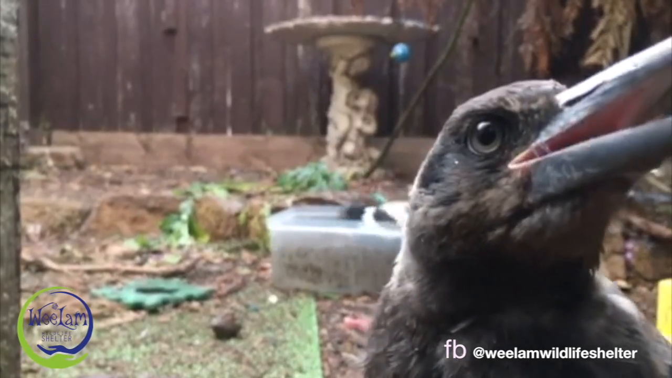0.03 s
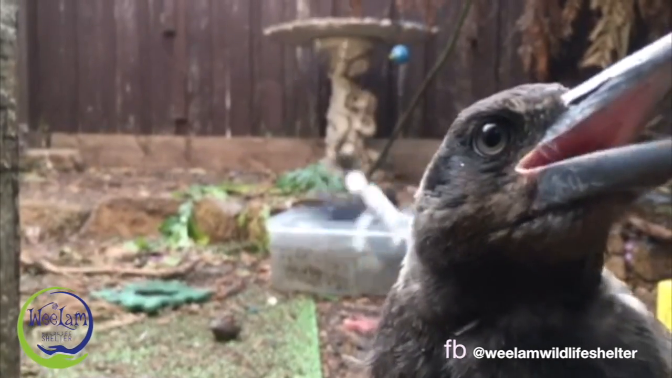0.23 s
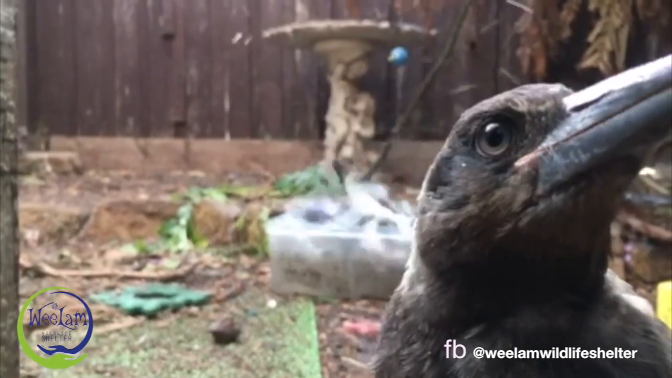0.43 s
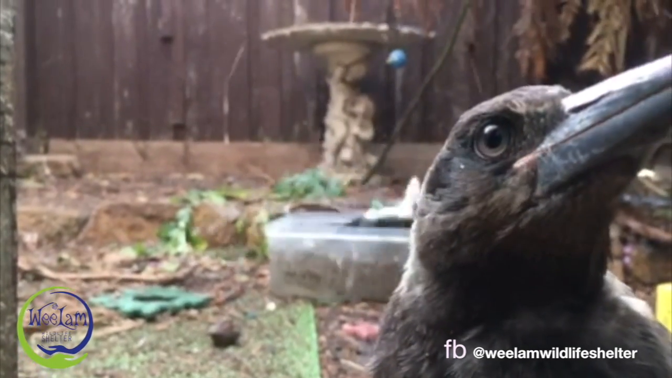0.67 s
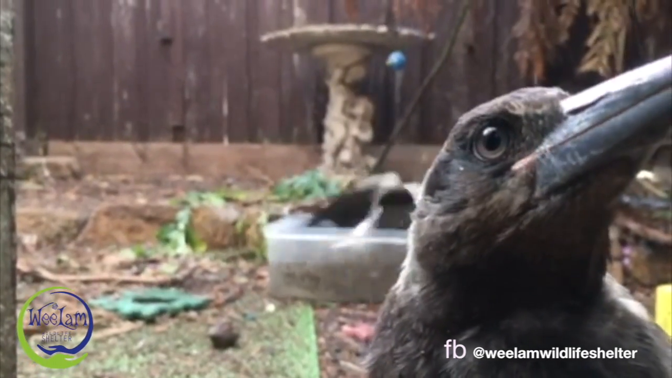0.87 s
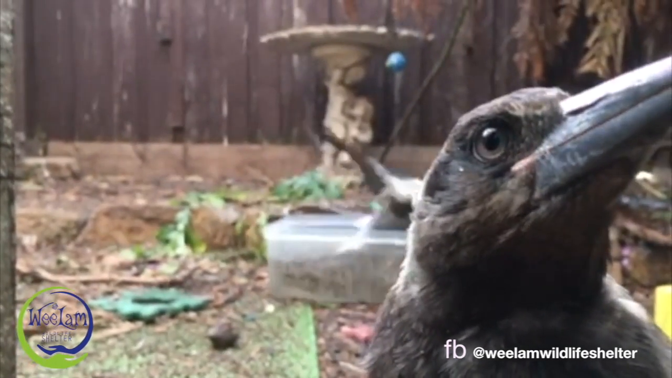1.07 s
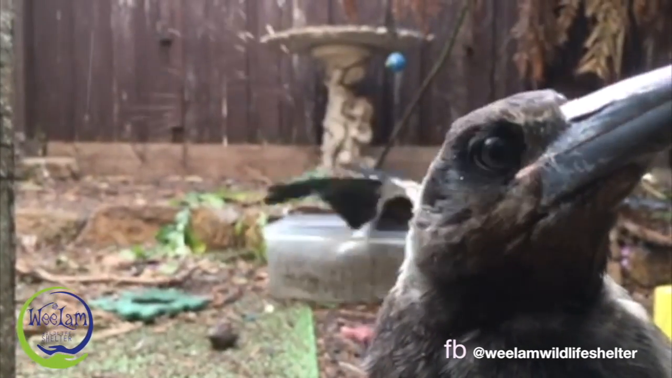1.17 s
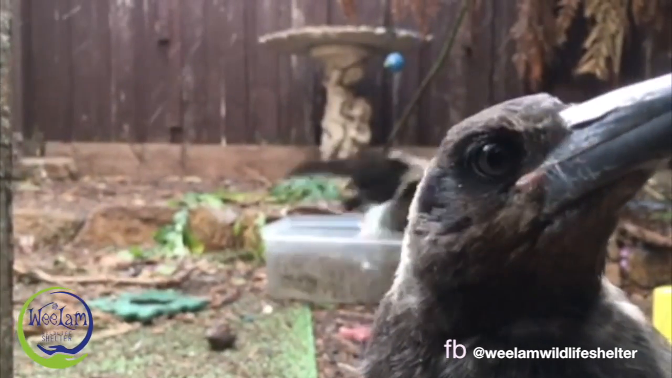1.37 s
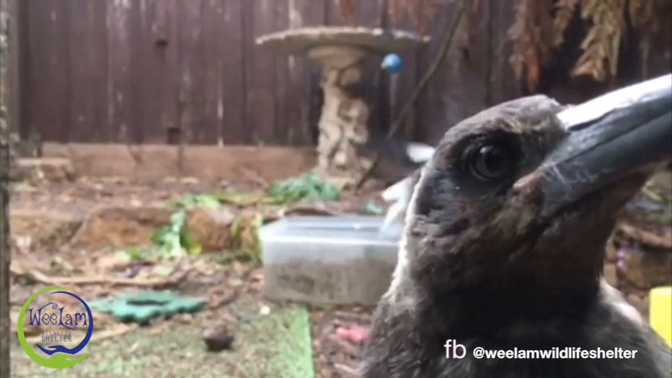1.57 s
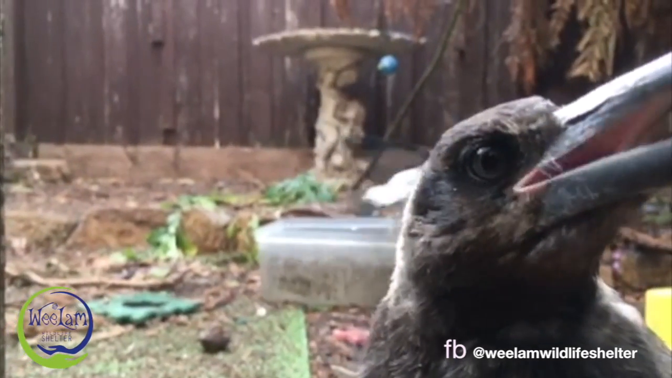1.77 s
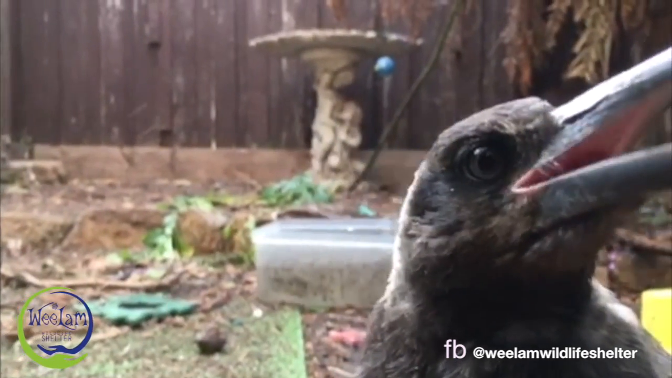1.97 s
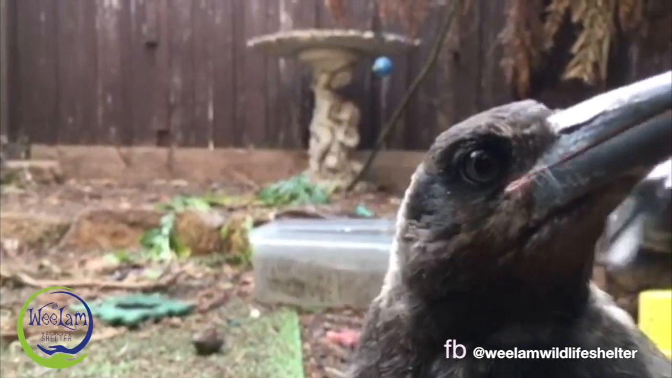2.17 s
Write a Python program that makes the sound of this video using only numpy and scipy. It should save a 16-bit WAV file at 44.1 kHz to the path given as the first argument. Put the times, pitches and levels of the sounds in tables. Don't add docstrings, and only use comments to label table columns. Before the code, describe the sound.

Two brief magpie squawks near the microphone, with light water splashes and clicks behind them

```python
import sys
import numpy as np
from scipy import signal
from scipy.fft import rfft, irfft, next_fast_len
from scipy.io import wavfile
from scipy.ndimage import uniform_filter1d, map_coordinates

SR = 44100
rng = np.random.default_rng(int(sys.argv[2]) if len(sys.argv) > 2 else 0)


def unload_wav(signal):
    wavfile.write(
        sys.argv[1],
        SR,
        np.round(np.clip(np.atleast_2d(signal).T, -1, 1) * 32767).astype(np.int16),
    )


def invert_db(x):
    u = np.asarray(x, float) / 20
    return 10 ** u


N = 99225
T = np.arange(N) / SR

# time in seconds, level in dB.
TOWN_LEVEL = [(0.0, -59.5), (0.1, -51), (0.41, -57), (0.44, -51), (0.52, -57.5), (0.6, -48.5),
              (0.73, -60.5), (0.83, -47), (0.88, -57.5), (0.93, -47.5), (1.02, -53), (1.15, -52.5),
              (1.23, -53.5), (1.27, -53), (1.98, -52.5), (2.07, -56), (2.1, -52), (2.25, -58)]
# frequency in Hz, density in dB per Hz.
RUMBLE_SPECTRUM = [(20, -44), (32, -24), (42, 0), (52, 2.5), (62, -5.5), (120, -13.5), (300, -23.5),
                   (700, -55.5)]
AIR_SPECTRUM = [(200, -39.5), (320, 0.5), (870, 0.5), (2100, -10), (5000, -14), (16000, -27)]
# frequency in Hz, 60 dB decay in seconds.
YARD_DECAY = [(500, 0.18), (2500, 0.28), (9000, 0.12)]
# start in seconds, length in seconds, first pitch in Hz, last pitch in Hz, level in dB.
FAR_MAGPIE_NOTES = [
    (-.03, .075, 1350, 1330, -70),
    (1.375, .085, 1225, 1260, -68),
    (1.45, .1, 1265, 1225, -71),
    (1.35, .06, 1050, 1060, -74),
    (1.43, .11, 1530, 1600, -79),
]
WHISTLE_NOTES = [
    (.745, .095, 1895, 1890, -70),
    (1.445, .07, 2660, 2720, -72),
    (1.535, .08, 2600, 2690, -62),
    (1.67, .1, 2660, 2740, -67),
    (1.76, .075, 2780, 2720, -69),
    (1.83, .05, 2700, 2680, -77),
]
PURE_NOTES = [(.115, .065, 3730, 3830, -61), (1.46, .05, 2850, 3050, -69), (1.49, .055, 3150, 2950, -68),
              (1.52, .03, 2300, 2150, -67), (.75, .04, 3800, 3790, -63), (.79, .05, 3800, 3770, -65),
              (.33, .1, 2520, 2480, -75), (1.415, .13, 3700, 3770, -67), (1.49, .11, 3530, 3480, -70),
              (1.432, .04, 800, 1200, -59), (.9, .17, 5400, 5250, -79), (1.02, .13, 660, 580, -70),
              (1.715, .03, 3150, 3150, -61), (1.75, .15, 1230, 1200, -74)]
# multiple of the pitch, level in dB.
FAR_MAGPIE_TONE = [(1, -9), (2, -1), (3, -5), (4, -12), (5, -18), (6, -16)]
WHISTLE_TONE = [(1, 0), (2, -9)]
# start in seconds, length in seconds, level in dB.
RUSTLE_BOUTS = [
    (.11, 0.13, -70.5),
    (.24, 0.092, -60),
    (.44, 0.306, -62.5),
    (.76, 0.24, -72.5),
    (2.11, 0.017, -67),
]
# frequency in Hz, density in dB per Hz.
MIST_SPECTRUM = [(700, -29.5), (3000, -3), (9500, -1), (16000, -12.5)]
SPRAY_SPECTRUM = [(180, -11), (300, -20), (494, -17), (624, -5.5), (689, -18), (1320, -13), (2440, -21.5),
                  (11700, -29.5), (16000, -39.5)]
# time in seconds, peak in dB, pitch in Hz.
SPATTER_DROPS = [(0.4418, -56, 3620), (0.4518, -58, 2500), (0.4523, -50, 4060), (0.4742, -46.5, 4220),
                 (0.4912, -43.5, 3203), (0.5141, -47, 4000), (0.568, -57, 4200), (0.6034, -43.5, 3700),
                 (0.6404, -47, 4000), (0.6937, -46, 6400), (0.7287, -43.5, 4740), (0.7601, -37.5, 3820),
                 (0.8813, -45.5, 6053), (0.9511, -49, 3860), (1.1098, -62, 3800)]
FINE_SPATTER_DROPS = [(0.4413, -61, 9720), (0.5171, -40, 11300), (0.568, -60, 8370), (0.5989, -48, 9500),
                      (0.6693, -63, 8900), (0.6942, -44, 12800), (0.7152, -58, 9200), (0.7312, -50, 10000),
                      (0.8753, -61, 11500), (0.9412, -64, 9200), (1.0484, -68, 7700), (1.1238, -65, 9530),
                      (1.1746, -49, 9700), (1.2162, -48.5, 9280)]
# time in seconds, peak in dB, pitch in Hz.
BUBBLES = [(0.433, -48, 1000), (0.471, -38, 982), (0.523, -33, 1135), (0.534, -34, 596),
           (0.565, -39.5, 1840), (0.579, -37.5, 1260), (0.613, -39.5, 2100), (0.648, -46, 970),
           (0.695, -38, 1640), (0.71, -43.5, 780), (0.729, -44, 474), (0.905, -42, 642),
           (1.137, -48.5, 1010), (1.159, -47, 1720), (1.186, -48, 587), (1.214, -31.5, 890),
           (1.218, -47.5, 242), (1.274, -47, 1460), (1.616, -40, 260), (1.723, -49, 3200),
           (1.767, -48, 430), (2.067, -57, 890), (2.21, -53.5, 315)]
# start in seconds, length in seconds, vigour in dB.
SPLASH_BOUTS = [
    (-.02, 0.02, -62.5),
    (0.437, 0.16, -57.5),
    (0.638, 0.12, -60),
    (0.716, 0.16, -70.5),
    (0.904, 0.096, -65),
    (1.115, 0.13, -67.5),
    (1.617, 0.01, -58),
    (1.7, 0.022, -66),
    (2.09, 0.022, -80),
    (2.222, 0.038, -73.5),
]
# time in seconds, peak in dB, pitch in Hz, ring over crack in dB.
TICKS = [
    (0.5676, -48.5, 5640, 0),
    (0.6943, -43.5, 12700, -6),
    (0.7891, -63, 5200, 11),
    (0.9507, -66, 4050, 13.5),
    (1.1849, -47, 4620, -4),
    (1.6283, -30, 5760, -7),
    (2.0462, -53.5, 9100, -7.5),
    (2.0872, -50.5, 9830, -4.5),
    (2.1131, -48, 4730, 2.5),
]
# time in seconds, pitch in Hz, level in dB, dullness in dB per octave, beak closing 0-1.
CLEAR_CALL = [
    (.199, 1200, -48, 14, 0),
    (.207, 1228, -18, 1.5, 0),
    (.221, 1270, -14, 0, .05),
    (.231, 1282, -14, 0, .85),
    (.255, 1272, -14.5, 1.5, 1),
    (.268, 1234, -21, 6.5, 1),
    (.303, 1190, -30.5, 11.5, 1),
    (.316, 1130, -42, 27, 1),
    (.336, 980, -68, 45, 1),
]
HOARSE_CALL = [
    (1.904, 822, -72, 44, 0),
    (1.9095, 820.3, -39, 15, 0),
    (1.914, 814.7, -26, 2.5, 0),
    (1.917, 834.7, -40, 2, 0),
    (1.923, 853, -29, 0.5, 0),
    (1.961, 871.7, -26.5, 0.5, 0),
    (1.981, 819.3, -28, 2.5, 0),
    (1.989, 806, -35, 12.5, 0),
    (1.999, 725, -49, 9, 0),
]
# time in seconds, hoarseness 0-1.
CLEAR_ROUGHNESS = [
    (.2, .3),
    (.222, .1),
    (.24, .035),
    (.258, .04),
    (.275, .07),
    (.33, .15),
]
HOARSE_ROUGHNESS = [
    (1.9, .85),
    (1.95, .8),
    (1.966, .4),
    (1.974, .13),
    (2.0, .2),
]
# multiple of the pitch, level in dB.
CLEAR_WIDE = [(1, 3.5), (2, -16), (3, -2.5), (4, -6.5), (5, -5), (6, -20.5), (7, -6.5), (8, -23),
              (9, -17.5), (10, -19.5), (11, -29), (12, -36.5)]
CLEAR_SHUT = [(1, -7), (2, -23), (3, -2.5), (4, 1), (5, -10), (6, -23.5), (7, -14.5), (8, -18), (9, -32.5),
              (10, -37), (11, -35), (12, -32.5)]
HOARSE_WIDE = [(1, -0.5), (2, -0.5), (3, -66), (4, -8.5), (5, -1.5), (6, -13), (7, -10.5), (8, -18),
               (9, -32), (10, -15), (11, -11), (12, -19.5), (13, -21.5), (14, -25), (15, -27), (16, -26),
               (17, -41), (18, -32), (19, -35.5)]


def unit(x):
    return x / np.sqrt(np.mean(x ** 2) + 1e-20)


def along(points, hz):
    f, v = np.transpose(points)
    return np.interp(np.log(hz + 1), np.log(f + 1), v)


def wobble(rate_hz):
    knots = rng.standard_normal(int(N * rate_hz / SR) + 4)
    return map_coordinates(knots, [T * rate_hz])


def filtered(x, response):
    m = next_fast_len(N + 8192)
    return irfft(rfft(x, m) * response(np.fft.rfftfreq(m, 1 / SR)), m)[:N]


def rush(spectrum, patchy_db):
    z = signal.stft(rng.standard_normal(N), nperseg=256)[2]
    field = uniform_filter1d(rng.standard_normal(z.shape), 6, 0)
    field = uniform_filter1d(field, 5, 1)
    noise = signal.istft(z * invert_db(patchy_db * unit(field)), nperseg=256)[1][:N]
    return unit(filtered(noise, lambda hz: invert_db(along(spectrum, hz))))


def place(times_s, sounds):
    starts = np.round(np.asarray(times_s) * SR).astype(int)
    at = starts[:, None] + np.arange(sounds.shape[1])
    return np.bincount(at.ravel(), sounds.ravel(), N + sounds.shape[1])[:N]


def bouts(rows):
    rise_s, t60_s = .008, .25
    total = np.zeros(N)
    for s, length_s, db in rows:
        rise = np.clip((T - s) / rise_s, 0, 1)
        total += rise * invert_db(db - 60 * np.clip(T - s - length_s, 0, None) / t60_s)
    return total


def town_rumble():
    level_db = np.interp(T, *np.transpose(TOWN_LEVEL)) + .8 * wobble(7)
    return invert_db(level_db) * rush(RUMBLE_SPECTRUM, patchy_db=-1.35)


def air():
    return invert_db(-68.5) * rush(AIR_SPECTRUM, patchy_db=3.0)


def yard(x):
    delay_s = 0.0073
    hz, t, z = signal.stft(rng.standard_normal(SR // 2), SR, nperseg=256)
    decay = invert_db(-60 * t / along(YARD_DECAY, hz)[:, None])
    tail = signal.istft(z * decay, SR, nperseg=256)[1]
    delayed = np.pad(x, (round(delay_s * SR), 0))
    return signal.fftconvolve(delayed, tail / np.linalg.norm(tail))[:N]


def far_birds(notes, tone):
    edge_s, flutter_db, waver = .015, 4.6, .01
    out = np.zeros(N)
    for s, length_s, first_hz, last_hz, db in notes:
        hz = np.interp(T, [s, s + length_s], [first_hz, last_hz])
        phase = 2 * np.pi * np.cumsum(hz * (1 + waver * wobble(90))) / SR
        shape = np.clip(np.minimum(T - s, s + length_s - T) / edge_s, 0, 1)
        for multiple, tone_db in tone:
            out += shape * invert_db(db + tone_db + flutter_db * wobble(110)) * np.sin(multiple * phase)
    return out


def rustling():
    return bouts(RUSTLE_BOUTS) * rush(MIST_SPECTRUM, patchy_db=6.0)


def spatter():
    cycles, grit_depth, level_db = 45, 0.45, -0.5
    s, db, hz = np.transpose(list(SPATTER_DROPS) + list(FINE_SPATTER_DROPS))[:, :, None]
    t = np.arange(700) / SR
    grit = 1 + grit_depth * rng.standard_normal((len(s), len(t) // 14)).repeat(14, axis=1)
    decay = invert_db(db + level_db - 60 * t * hz / cycles)
    return place(s[:, 0], decay * grit * np.sin(2 * np.pi * hz * t))


def bubbles():
    cycles, rise, attack_s = 22, .12, 0.00094
    slap_db, slap_t60_s, slap_top_hz, slap_low_hz = -1, .035, 1500, 220
    s, db, hz = np.transpose(BUBBLES)[:, :, None]
    t = np.arange(2600) / SR
    life_s = cycles / hz
    ring = np.sin(2 * np.pi * hz * t * (1 + rise * t / life_s))
    ring = ring * invert_db(db - 60 * t / life_s) * (1 - np.exp(-t / attack_s))
    slap = invert_db(db + slap_db - 60 * t / slap_t60_s) * rng.standard_normal(ring.shape)
    puff = filtered(place(s[:, 0], slap), lambda f: 3 / (1 + (f / slap_top_hz) ** 4) * f / (f + slap_low_hz))
    return place(s[:, 0], ring) + puff


def splashing():
    count, centre_hz, spread, cycles = 1200, 2800, .7, 5
    t = np.arange(500) / SR
    hz = np.clip(centre_hz * np.exp(spread * rng.standard_normal((count, 1))), 300, 15000)
    size = invert_db(3 * rng.exponential(size=(count, 1)))
    rings = size * np.sin(2 * np.pi * hz * t) * np.exp(-t * hz / cycles)
    droplets = place(rng.uniform(0, N / SR, count), rings)
    vigour = bouts(SPLASH_BOUTS) * invert_db(2.2 * wobble(90))
    return vigour * (rush(SPRAY_SPECTRUM, patchy_db=3.0) + invert_db(-3) * unit(droplets))


def ticks():
    crack_t60_s, ring_t60_s, ring_gain_db = 0.013, 0.011, 3
    low_hz, top_hz = 2500, 9200
    s, db, hz, ring_db = np.transpose(TICKS)[:, :, None]
    t = np.arange(900) / SR
    crack = invert_db(db - 60 * t / crack_t60_s) * rng.standard_normal((len(s), len(t)))
    ring = invert_db(db + ring_db + ring_gain_db - 60 * t / ring_t60_s) * np.sin(2 * np.pi * hz * t)
    return filtered(place(s[:, 0], crack + ring), lambda f: 1j * f / (low_hz + 1j * f) / (1 + 1j * f / top_hz))


def squawk(call, roughness, wide, shut):
    jitter, jitter_hz, shimmer_db, shimmer_hz = .03, 700, 2.6, 800
    pitch_drift, overtone_drift_db, drift_hz = .003, 1.1, 90
    phase_smear_rad, rasp_db, beak_low_hz = .45, -4, 520
    s, *cols = np.transpose(call)
    hz, level_db, dull_db, closing = (np.interp(T, s, c) for c in cols)
    rough = np.interp(T, *np.transpose(roughness))
    shake = jitter * rough * wobble(jitter_hz) + pitch_drift * wobble(drift_hz)
    phase = 2 * np.pi * np.cumsum(hz * (1 + shake)) / SR

    k, wide_db = np.transpose(wide)[:, :, None]
    shut_db = np.transpose(shut)[1][:, None]
    beak_db = wide_db + (shut_db - wide_db) * np.clip(closing, 0, 1)
    gains = invert_db(beak_db - dull_db * np.log2(np.maximum(k - 1, 1)))
    gains = gains / np.sqrt(np.sum(gains ** 2, 0) / 2)
    shimmer = shimmer_db * rough * wobble(shimmer_hz) * np.minimum(k / 4, 1)
    drift = overtone_drift_db * (k > 1) * np.array([wobble(drift_hz) for _ in k])
    gains = gains * invert_db(shimmer + drift)
    tone = np.sum(gains * np.sin(k * phase + rng.normal(0, phase_smear_rad, k.shape)), 0)

    throat = [(.5, -46.5), (1.15, -8), (2, -7)] + list(wide)[2:] + [(len(wide) + 1, -60)]
    throat = [(m * np.median(cols[0]), db) for m, db in throat]
    rasp = rush(throat, patchy_db=3) * (1 + np.cos(phase))
    sounding = (T > s[0]) & (T < s[-1])
    voice = sounding * invert_db(level_db) * (tone + invert_db(rasp_db - dull_db / 4) * rough * rasp)
    return filtered(voice, lambda f: 1 / (1 + (beak_low_hz / (f + 1)) ** 8))


def scene():
    floor = town_rumble() + air()
    far = far_birds(FAR_MAGPIE_NOTES, FAR_MAGPIE_TONE) + far_birds(WHISTLE_NOTES, WHISTLE_TONE)
    far = far + far_birds(PURE_NOTES, [(1, 0)])
    hits = spatter() + bubbles() + ticks()
    near = squawk(CLEAR_CALL, CLEAR_ROUGHNESS, CLEAR_WIDE, CLEAR_SHUT)
    near = near + squawk(HOARSE_CALL, HOARSE_ROUGHNESS, HOARSE_WIDE, HOARSE_WIDE)
    near_lifted = filtered(near, lambda f: 1 + (f / 7000) ** 2)
    echo = yard(invert_db(-36.5) * near_lifted + invert_db(-10) * (far + hits))
    return (floor + far + rustling() + hits + splashing() + near + echo)[None]


def roll_off(x):
    return signal.sosfilt(signal.butter(12, 16440, fs=SR, output="sos"), x)


def record(dry):
    mic_top_hz = 16100
    mix = filtered(dry[0], lambda f: 1 / (1 + (f / mic_top_hz) ** 40))[None]
    return roll_off(mix)


dry = scene()
out = record(dry)
unload_wav(out)
```